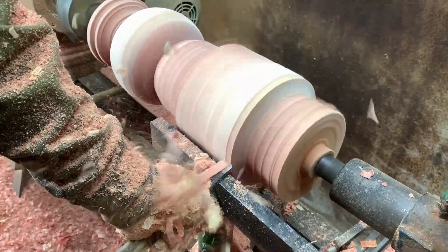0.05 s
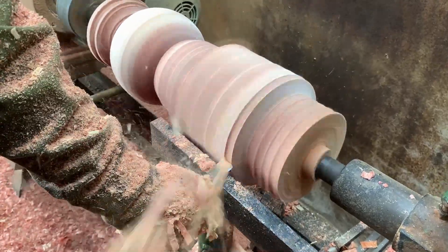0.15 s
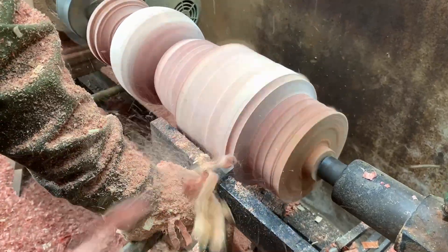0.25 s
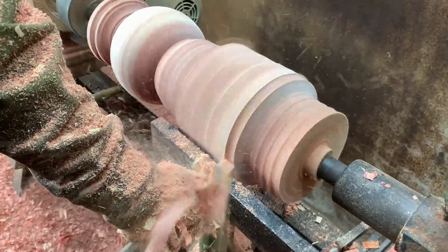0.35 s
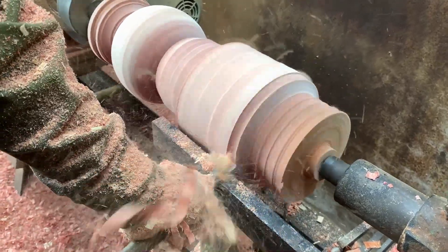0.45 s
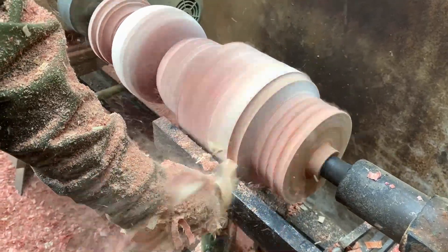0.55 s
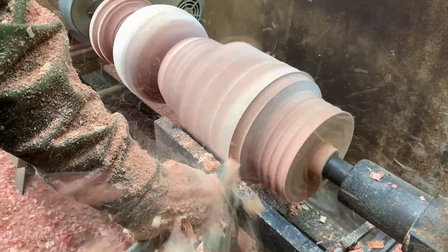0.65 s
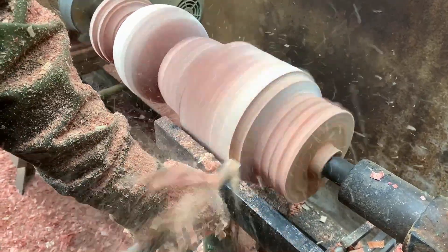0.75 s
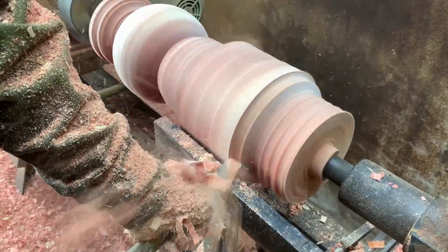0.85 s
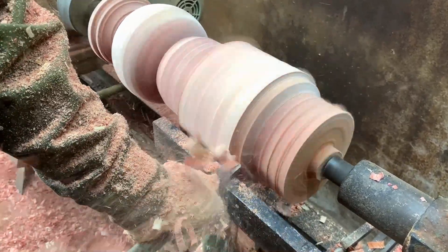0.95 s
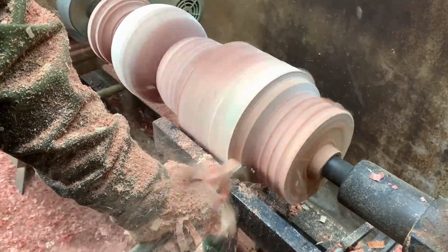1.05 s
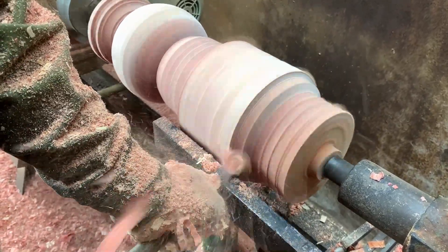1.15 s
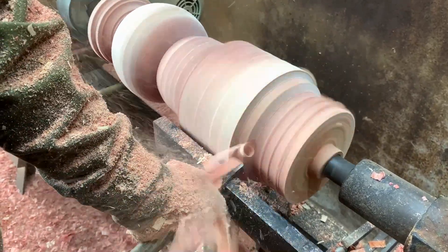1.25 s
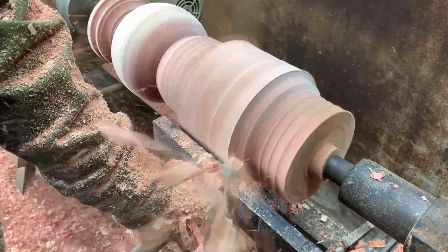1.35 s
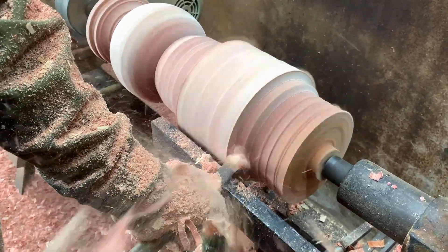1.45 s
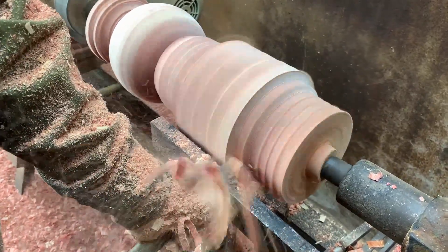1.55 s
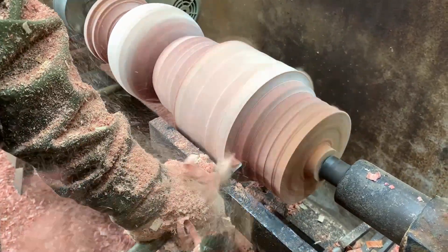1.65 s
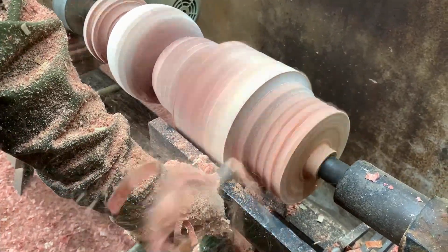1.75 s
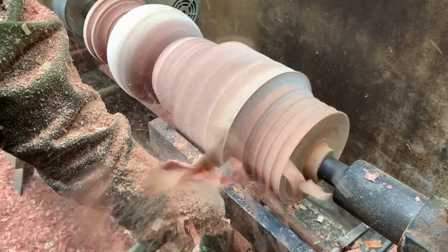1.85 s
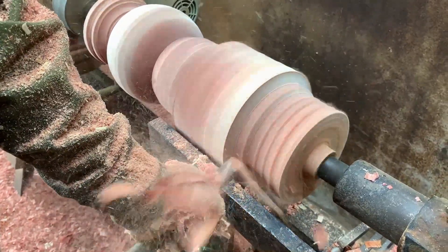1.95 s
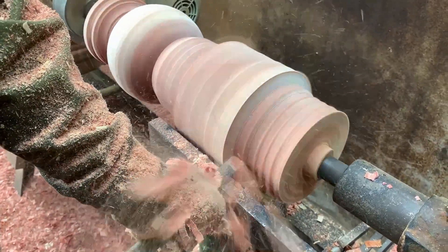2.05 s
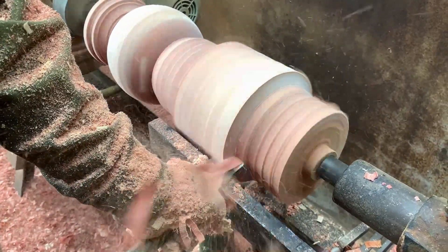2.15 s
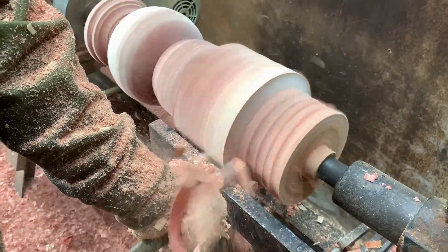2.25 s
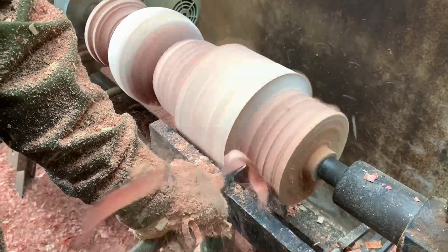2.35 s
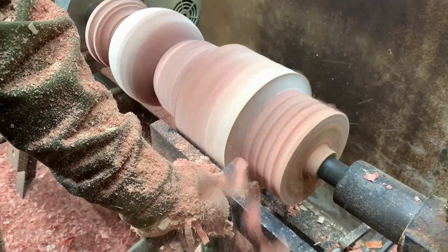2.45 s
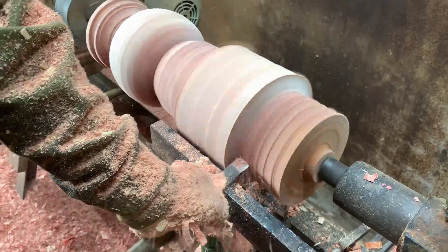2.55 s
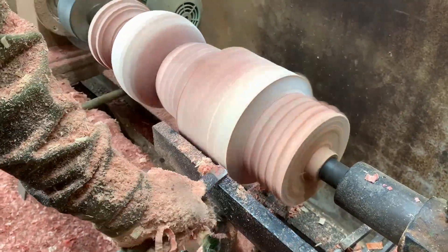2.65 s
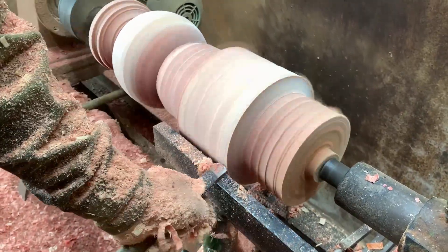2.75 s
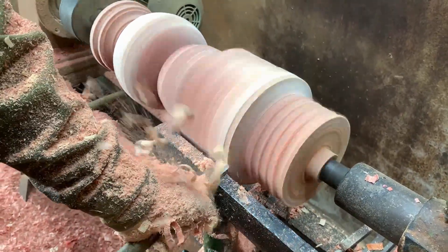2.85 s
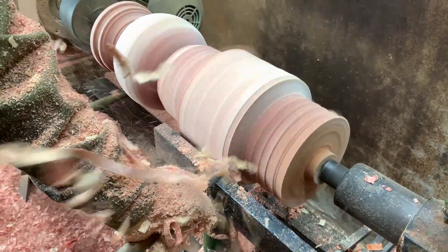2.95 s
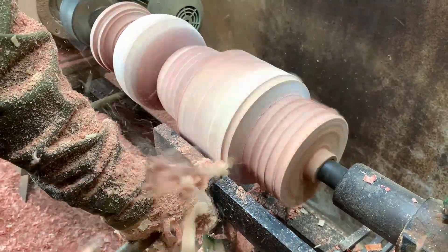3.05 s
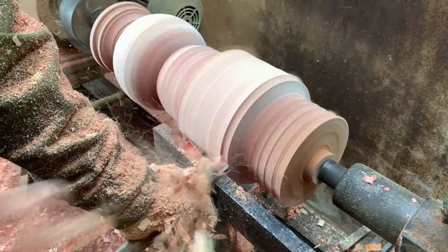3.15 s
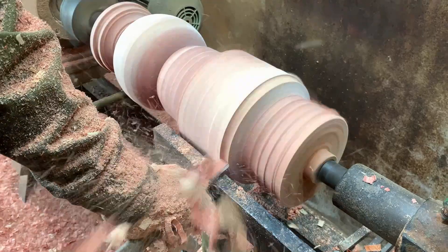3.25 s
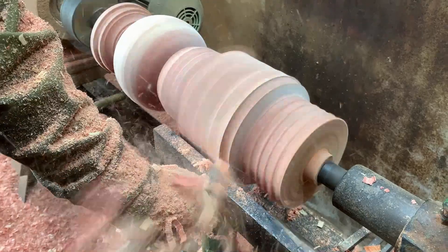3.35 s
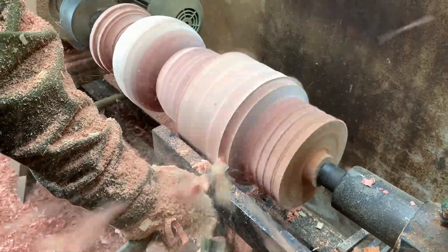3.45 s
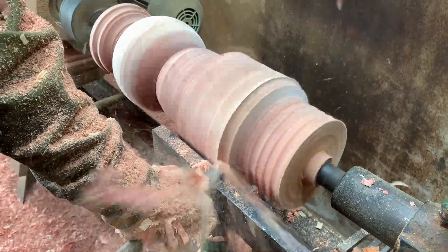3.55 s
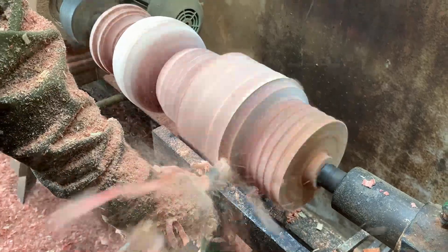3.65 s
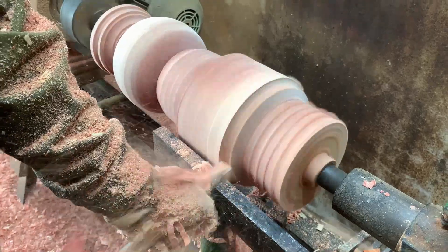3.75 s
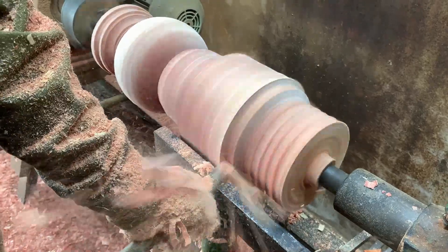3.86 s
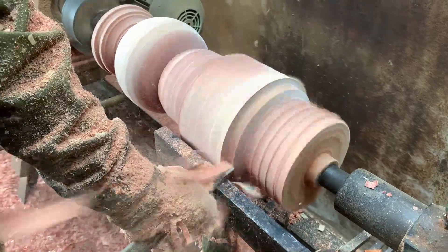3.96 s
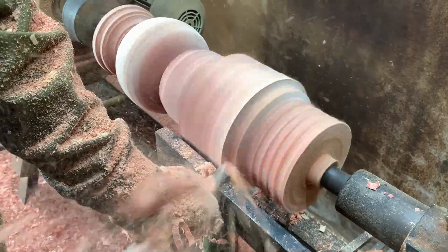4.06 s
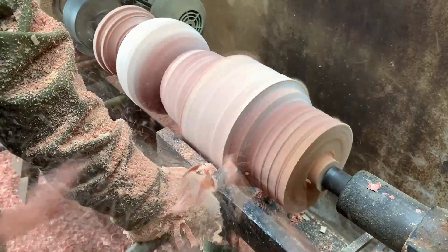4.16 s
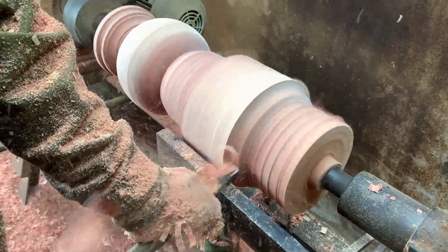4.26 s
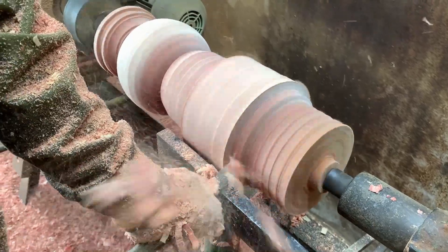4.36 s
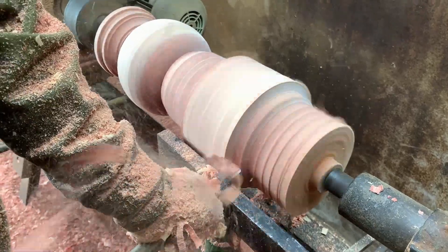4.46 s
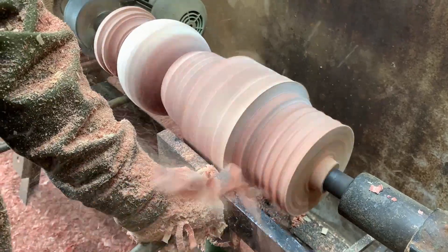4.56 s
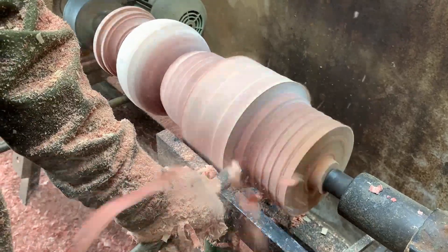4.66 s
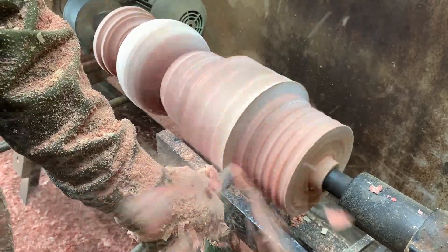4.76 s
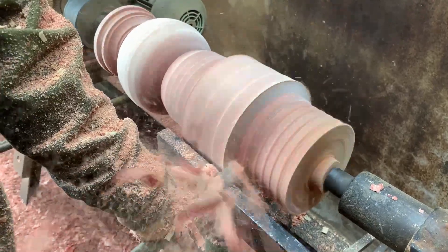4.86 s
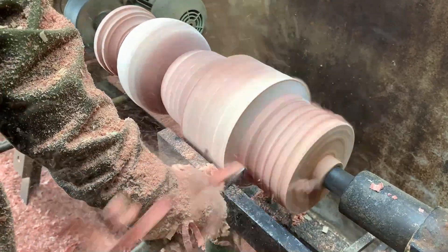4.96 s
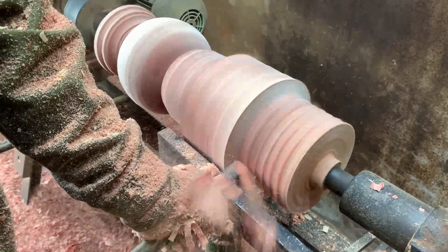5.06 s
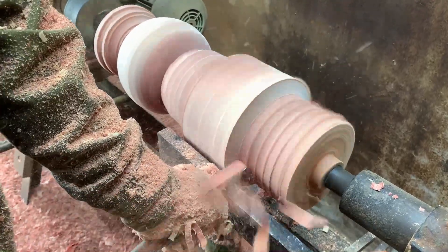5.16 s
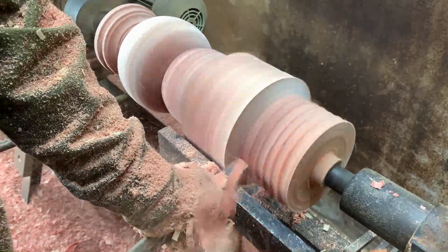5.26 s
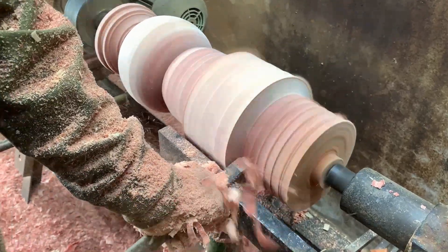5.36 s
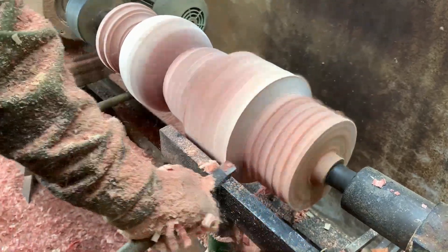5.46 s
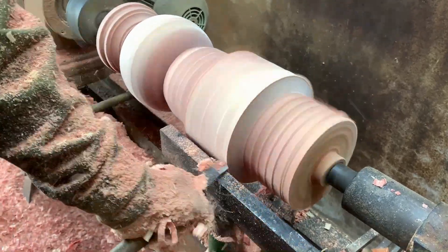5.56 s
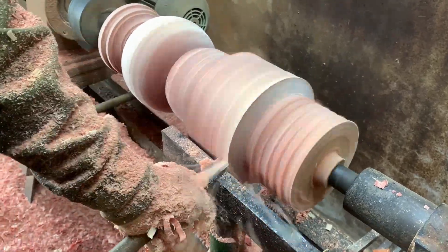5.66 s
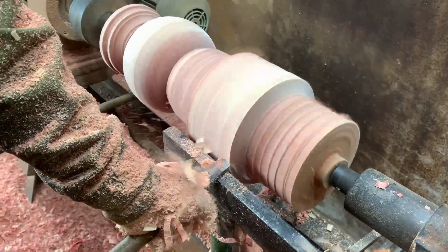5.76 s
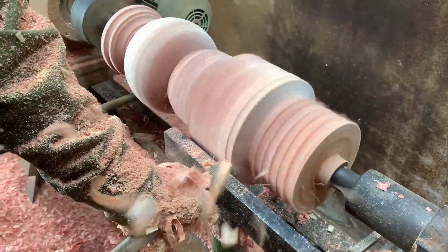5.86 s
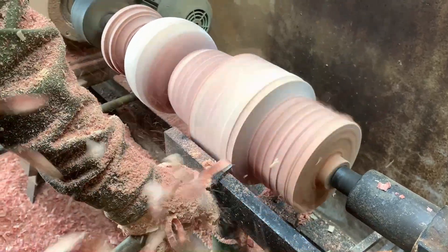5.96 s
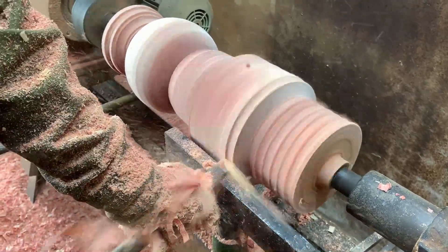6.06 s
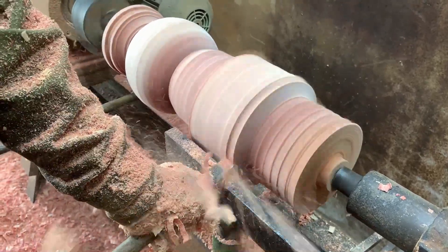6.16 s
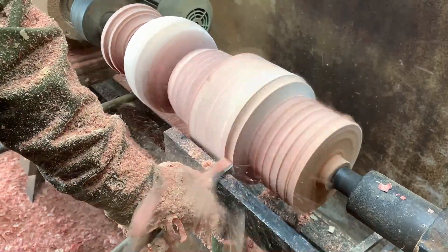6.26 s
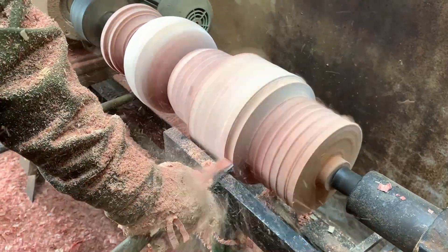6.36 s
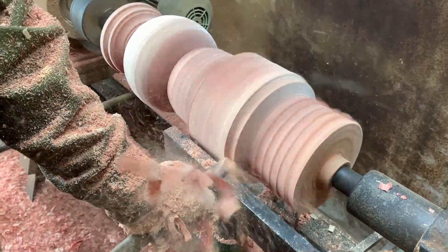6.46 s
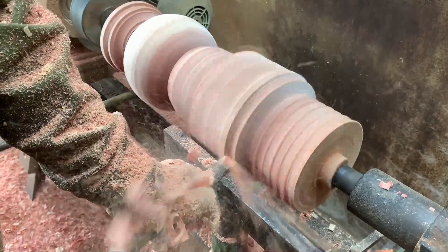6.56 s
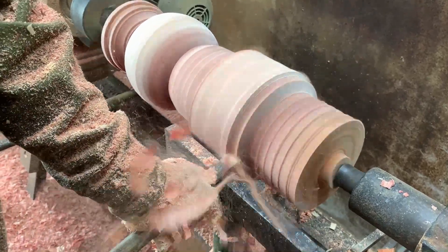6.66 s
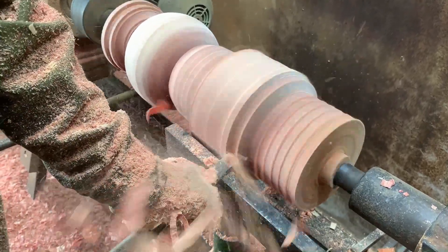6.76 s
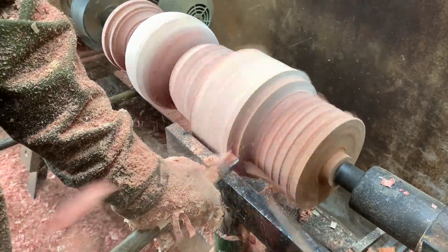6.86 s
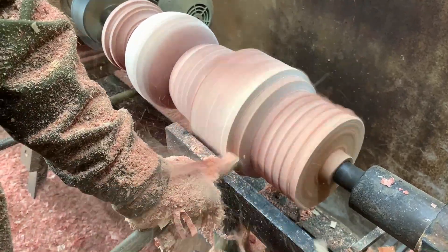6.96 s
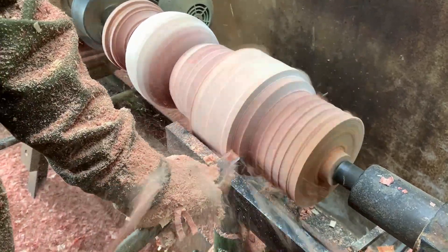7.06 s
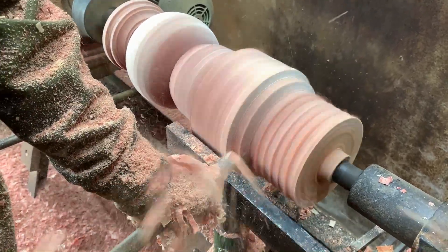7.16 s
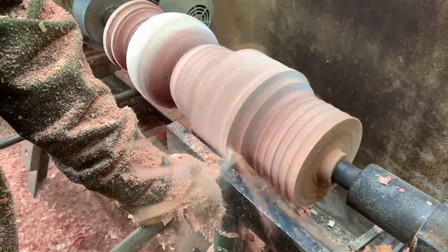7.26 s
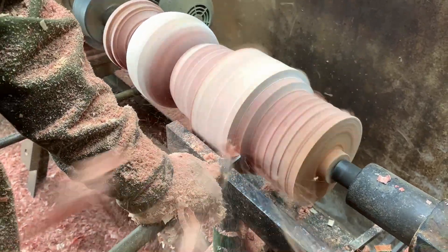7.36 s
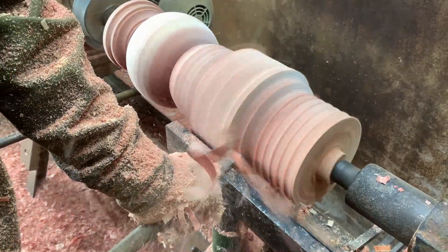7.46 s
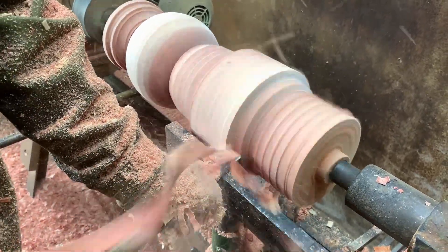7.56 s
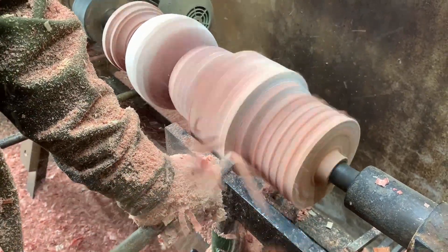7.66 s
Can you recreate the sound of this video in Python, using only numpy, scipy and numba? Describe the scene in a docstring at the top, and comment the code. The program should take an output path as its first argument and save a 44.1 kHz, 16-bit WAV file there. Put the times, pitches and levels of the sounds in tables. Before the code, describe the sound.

Close to a lathe in a workshop, a gouge peels a spinning wooden blank in three passes of over two seconds each. Every cut is a rough metallic screech with bright hiss and crackle, throbbing rapidly with the rotation, its lower ring mostly gliding down. Splinters snap, shavings thump softly, and short gaps leave only the quiet motor hum and whir.

```python
"""Gouge on a spinning wooden blank

A gouge peels three passes off a blank on a lathe, close by. Noise and random snaps drive the steel's modes,
whose lower ring mostly falls as the tool slides further out over its rest; hiss and bright crackle lie on top.
Tough grain lifts the cut once a turn, splinters crack off and the edge crunches as it snags on entry. The blank
rings low, shavings land as dull thumps in stirred air, and wavering tones and noise run underneath."""
import sys
import numpy as np
from scipy import signal
from scipy.fft import rfft, irfft
from scipy.io import wavfile
from scipy.ndimage import uniform_filter1d
from numba import njit

SR = 44100
rng = np.random.default_rng(int(sys.argv[2]) if len(sys.argv) > 2 else 0)


def digitize_waveform(pressure):
    """Quantize a signal to 16-bit integers and store it at the path in sys.argv[1].

    Rows of a 2-D input are taken as channels; values are limited to [-1, 1].
    """
    field = np.atleast_2d(pressure).T
    bounded = np.clip(field, -1, 1)
    quanta = np.round(bounded * 32767).astype(np.int16)
    wavfile.write(sys.argv[1], SR, quanta)


N = 339570
TIME = np.arange(N) / SR
TURNS_PER_S = 16.75

# the three passes: (edge bites [s], slide starts [s], edge lifts [s], least overhang [0-1],
# share of the full stroke, lighter at entry [dB], fade on lifting [dB per s], sag of the high modes [0-1])
PASSES = [(-0.2, 0.0, 2.575, .01, .975, 2, 370, .17), (2.852, 2.76, 5.385, .1, 1.01, 4.5, 230, .04),
          (5.7, 5.87, 8.0, .04, 1.0, 9, 300, 0)]
# the edge snags on the rim as it enters: (time [s], crunch level [dB], crackle level [dB], half length [s])
SNAGS = [(2.862, -28, -23, .009), (2.881, -24, -28, .009), (2.932, -33, -30, .012), (5.677, -52, -58, .012),
         (5.718, -33, -39, .016), (5.775, -29, -36, .012)]
# hiss of the parting fibres: (frequency [Hz], relative level per Hz [dB])
FIBRE_HISS = [(1000, 4), (2500, 8), (4500, 24.5), (5700, -44), (7500, -12), (11000, 18.5), (14000, -15.5),
              (15500, -35)]
# clumps of shavings landing: (nominal time [s], relative level [dB], pitch [Hz])
THUMPS = [(0.925, -37, 161), (0.959, -36, 75), (1.049, -39, 89), (1.119, -44, 61), (1.405, -37.5, 278),
          (2.365, -36, 135), (4.103, -32.5, 172), (5.39, -43, 80), (5.666, -34, 79), (6.453, -39, 114),
          (6.722, -42, 82), (6.899, -39, 97), (7.57, -44, 90)]


def cutting(ring_db, crackle_db, overhang, sag, tough_db):
    """The shaving breaks up unevenly; each break rings the tool and hisses."""
    # bending modes of the gouge: (width [Hz], [(overhang [0-1], frequency [Hz], relative level [dB]), ..])
    bending = [(136, [(0, 1240, -11), (.6, 1266, -8.5), (.85, 1120, -6.5), (1, 1050, 5.5)]),
               (81, [(0, 2397, -9.5), (.25, 2415, -6), (.42, 2280, 5), (.6, 2160, 7), (.8, 1870, 7),
               (1, 1900, 5)]), (158, [(0, 3780, 6.5), (.2, 3285, 9.5), (.4, 3063, 6.5), (.6, 3010, 3),
               (.8, 2820, -2), (1, 2970, -2.5)]), (417, [(0, 3700, -15), (.5, 3760, -19), (1, 3370, -30)]),
               (240, [(0, 4860, 2.5), (.4, 4820, -3.5), (.7, 4900, -4.5), (1, 4540, -16.5)]),
               (214, [(0, 5000, -22), (.5, 4950, -29.5), (1, 5200, -18)]), (945, [(0, 3420, -15.5),
               (.5, 2590, -8.5), (1, 2040, -15.5)])]
    # high modes of the gouge: (width [Hz], [(overhang [0-1], frequency before sag [Hz], relative level [dB]), ..])
    shrill = [(450, [(0, 6470, 0.5), (.25, 6540, 7), (.5, 6760, 3), (1, 5900, -7)]), (450, [(0, 7930, 7),
              (.25, 8300, 5.5), (.5, 8540, 9.5), (.8, 8680, 12.5), (1, 8600, 19.5)]),
              (700, [(0, 9800, -16.5), (.6, 9700, 13.5), (1, 9700, 4)]), (800, [(0, 12680, 3),
              (.5, 12910, 16), (.68, 12600, 22), (.78, 10740, 17), (.85, 10650, 8), (1, 9300, 10.5)]),
              (800, [(0, 13600, -45), (.6, 13500, -32), (1, 12800, 9)])]
    breaks = breakage(66)
    wobble = overhang + .021 * drift(20)   # the tool shifts in the hand

    force_db = .62 * tough_db + 1.1 * breaks
    force = tearing(force_db, snaps_per_s=640, snap_size=1.4, spread_db=2.0)
    ring = through_rest(gouge(force, bending, wobble, flicker_db=1.82))
    ring = evened(with_echoes(ring, wet=0.57))

    sharp_db = tough_db + 2.1 * breaks
    sharp = tearing(sharp_db, snaps_per_s=800, snap_size=.9, spread_db=2.5)
    hiss = from_db(-10.0 + sharp_db) * noise(FIBRE_HISS)
    crackle = through_rest(gouge(sharp, shrill, wobble, flicker_db=3.0, sag=sag) + hiss)
    crackle = evened(with_echoes(crackle, wet=.5))

    # both lean slightly to the second ear
    ring = from_db(ring_db) * ring * from_db([[-.45], [.45]])
    crackle = from_db(crackle_db) * crackle * from_db([[-.25], [.25]])
    return ring + crackle


def gouge(force, modes, overhang, flicker_db, sag=0):
    """The steel's modes shift and trade strength as more of it overhangs the rest; each flickers by itself."""
    out = 0
    for width_hz, track in modes:
        hz, db = along(track, overhang)
        flickering = force * from_db(flicker_db * drift(70))
        out = out + from_db(db) * resonate(flickering, hz * (1 - sag), width_hz)
    return out


def tearing(force_db, snaps_per_s, snap_size, spread_db):
    """Steady rubbing plus fibres that snap at random, both following the cutting force."""
    snapping = rng.random(N) < snaps_per_s / SR
    strength_db = spread_db * np.minimum(rng.exponential(1, N), 4)
    snaps = snapping * from_db(strength_db)
    return from_db(force_db) * white() * (1 + snap_size * snaps)


def breakage(corner_hz, size=1100):
    """The shaving snaps and re-forms many times within one turn; slower change is removed."""
    fast = drift(corner_hz)
    return rms_one(fast - uniform_filter1d(fast, size))


def toughness():
    """Extra cutting force in dB as the tough side and the hard streaks come round."""
    # the tough side of the blank, one row per pass: (place on the rim [turns], level [dB])
    tough_side = [(.25, 4), (.82, 3.2), (.29, 6.5)]
    # narrow streaks of hard grain: (from [s], to [s], place on the rim at start [turns], at end [turns], level [dB])
    streaks = [(.65, 1.6, .15, .25, 4.5), (1.7, 2.2, .9, .84, 6), (2.95, 4.4, .71, .92, 4),
               (2.95, 3.95, .4, .48, 4), (4.42, 4.95, .59, .61, 7), (5.95, 7.7, .38, .38, 3)]
    side_width_turns, streak_width_turns, streak_fade_s = .18, .055, .08
    place, side_db = per_pass(tough_side)
    out = side_db * once_a_turn(place, side_width_turns)
    for start, end, first, last, db in streaks:
        present = np.clip(np.minimum(TIME - start, end - TIME) / streak_fade_s + .5, 0, 1)
        place = np.interp(TIME, [start, end], [first, last])
        out = out + db * present * once_a_turn(place, streak_width_turns)
    return out


def handling():
    """The edge bites, bounces, settles, slides out and lifts: contact in dB, overhang 0-1, sag of pitch 0-1."""
    # the stroke that every pass follows: (time since the slide started [s], overhang before scaling [0-1])
    stroke = [(-.15, 0), (.1, .06), (.5, .18), (1.0, .36), (1.5, .6), (2.0, .75), (2.7, .98)]
    attack_db_per_s, settle_s = 2000, .11   # the edge enters at once, then settles to full depth
    bounce_db, bounce_delay_s, bounce_width_turns = 13, .047, .17
    # the high modes sink over about this long around the lift, lowest this long after it, as the pressure comes off
    sag_s = .05
    free_db = -45   # contact with the edge in free air

    bite_s, slide_s, lift_s, entry, reach, light_db, fade_db_per_s, sag_share = per_pass(PASSES)
    attack_db = attack_db_per_s * np.minimum(TIME - bite_s, 0)
    # until it settles, the edge is thrown off once a turn
    thrown_db = bounce_db * once_a_turn((bite_s + bounce_delay_s) * TURNS_PER_S, bounce_width_turns)
    settle_db = -(light_db + thrown_db) * np.exp(-np.maximum(TIME - bite_s, 0) / settle_s)
    release_db = -fade_db_per_s * np.maximum(TIME - lift_s, 0)
    contact_db = np.maximum(attack_db + settle_db + release_db, free_db)

    slid, = along(stroke, TIME - slide_s)
    overhang = np.maximum(reach * slid, entry)
    sag = sag_share * np.exp(np.minimum((TIME - lift_s) / sag_s - 1, 0))
    return contact_db, overhang, sag


def cut_levels(contact_db):
    """Ring and crackle in dB follow effort and contact; the crackle jumps where the edge snags."""
    # how hard the gouge cuts, one table per pass, before trims and contact:
    # (time [s], tool ring level [dB], crackle level [dB])
    effort = [
        [(0.02, -22.9, -31.4), (0.34, -22.3, -28.7), (0.5, -24.6, -31.5), (0.9, -22.5, -28.7),
         (1.06, -26.0, -33.9), (1.54, -22.0, -27.2), (1.62, -24.8, -29.5), (1.86, -28.0, -29.6),
         (2.3, -25.3, -28.2), (2.56, -28.8, -31.4)],
        [(2.93, -26.1, -30.0), (3.19, -23.3, -27.2), (3.79, -26.3, -31.9), (3.89, -23.7, -29.6),
         (4.05, -25.1, -31.6), (4.21, -23.0, -28.4), (4.61, -27.3, -30.3), (4.77, -23.9, -26.7),
         (4.95, -26.5, -30.2), (5.35, -26.4, -28.3)],
        [(5.98, -26.7, -34.3), (6.22, -24.1, -29.6), (6.56, -27.0, -34.5), (6.74, -23.8, -29.7),
         (7.12, -25.6, -33.3), (7.24, -25.7, -29.5), (7.34, -27.6, -35.0), (7.66, -26.1, -30.3)],
    ]
    ring_trim_db, crackle_trim_db = .25, -.1
    crackle_follows = 1.3   # dB for each dB of contact
    ring_db, crackle_db = along(np.vstack(effort), TIME)
    crackle = from_db(crackle_db + crackle_trim_db + crackle_follows * contact_db)
    snagging = sum(swell(s, db, width_s) for s, _, db, width_s in SNAGS)
    return ring_db + ring_trim_db + contact_db, 20 * np.log10(crackle + snagging)


def splinters():
    """A splinter is a few milliseconds of dense, bright cracking."""
    # splinters cracking off: (nominal time [s], relative level [dB])
    cracks = [(0.9028, -16.5), (1.1423, -21), (1.3808, -20), (1.5035, -14), (1.8981, -20), (2.8555, -19),
              (3.0849, -15), (3.2071, -14), (3.4231, -17), (4.4523, -18.5), (4.7496, -20), (4.809, -16),
              (7.224, -17), (7.5424, -18)]
    bright = resonate(white(), 13400, 1500) + from_db(-12) * noise(FIBRE_HISS)
    bright = rms_one(through_rest(bright))
    bursts = sum(swell(s + 0.00068, db, width_s=0.0052) for s, db in cracks)
    return from_db(-6) * bright * bursts


def snags():
    """A snag crushes the rim with a broad crunch."""
    centre_hz, width_hz = 3400, 2400
    crunch = resonate(resonate(white(), centre_hz, width_hz), centre_hz, width_hz)
    crunch = rms_one(through_rest(crunch))
    return crunch * sum(swell(s, db, half_s) for s, db, _, half_s in SNAGS)


def blank(level_db, tough_db, bite):
    """The same cut shakes the heavy blank, which rings low, and a little higher once the tool lets go."""
    # ring of the blank between its centres, edge in the wood: (frequency [Hz], width [Hz], relative level [dB])
    blank_modes = [(598.2, 23.5, 2.5), (454, 41, -29.5), (240.5, 41, -20.5)]
    force = white() * from_db(0.23 * tough_db)
    freed = 1 + 0.13 * (1 - bite)
    ring = sum(from_db(db) * resonate(force, hz * freed, width_hz) for hz, width_hz, db in blank_modes)
    ring = signal.sosfilt(signal.butter(3, 720, fs=SR, output="sos"), ring)
    return from_db(level_db) * evened(ring)


def blank_level(contact_db, overhang):
    """The blank shakes most in mid stroke and never falls below its idle level; in dB."""
    # shaking along the stroke, before trim and contact: (overhang [0-1], level [dB])
    shake = [(0, -44), (.2, -38.5), (.5, -37.5), (1, -39.5)]
    trim_db, idle_db = -1, -59
    follows = .6   # dB for each dB of contact
    shake_db, = along(shake, overhang)
    return np.maximum(shake_db + trim_db + follows * contact_db, idle_db)


def shavings(draught_db):
    """Flying shavings stir lumpy air, and clumps land with a dull thump."""
    # air stirred by the blank and the flying shavings: (frequency [Hz], relative level per Hz [dB])
    stirred = [(20, -8), (40, -4), (70, 3), (130, -2), (200, -2.5), (300, -14), (600, -23), (1500, -38)]
    air = from_db(draught_db + 2.7 * drift(19)) * noise(stirred)
    puff = white()
    thumps = 0
    for s, db, hz in THUMPS:
        thump = rms_one(resonate(resonate(puff, hz, 130), hz, 130))
        thumps = thumps + swell(s + 0.016, db - 4.5, width_s=0.011) * thump
    return (air + thumps) * from_db([[-.8], [.8]])


def draught_level():
    """The draught in dB wanders slowly and swells around each falling clump."""
    air_db, wander_db, wander_hz = -54.7, 1.5, 5
    # air pushed along by a clump of pitch gust_hz, relative to its tabled level; higher-pitched clumps push less
    gust_db, gust_s, gust_hz = -18, .09, 80
    gusts = sum(gust_hz / hz * swell(s + .04, db + gust_db, gust_s) for s, db, hz in THUMPS)
    steady = from_db(air_db + wander_db * drift(wander_hz))
    return 20 * np.log10(steady + gusts)


def lathe():
    """Steady tones waver slightly over the rush of the running lathe."""
    # steady tones heard while the lathe runs: (frequency [Hz], relative level [dB])
    tones = [(226.1, -61), (452, -76), (624.5, -53), (6756, -80), (12010, -82)]
    # rush of the running lathe: (frequency [Hz], relative level per Hz [dB])
    rush = [(60, 2), (200, -1), (320, -8), (700, 0.5), (1300, 5.5), (2500, -7), (4500, -12), (8000, -11),
            (12500, -23), (15500, -18)]
    out = from_db(-56) * noise(rush)
    ears = np.array([[0], [np.pi / 2]])   # a quarter cycle apart
    for hz, db in tones:
        wavering_hz = hz * (1 + 0.0014 * drift(15))
        phase = 2 * np.pi * np.cumsum(wavering_hz) / SR
        level = from_db(db + 2.0 + drift(22))
        out = out + level * np.sqrt(2) * np.sin(phase + ears)
    return out


def through_rest(x):
    """The rest and bed colour the sound: a falling mode flares as it crosses one of their resonances."""
    # resonances (+) and hollows (-) of the tool rest and bed: (frequency [Hz], width [Hz], level [dB])
    resonances = [(830, 220, -11), (1090, 110, 4), (1280, 70, 3), (1925, 60, 5), (2030, 70, -4),
                  (2181, 45, 6), (2443, 60, 7), (2905, 50, 3), (3015, 45, 4), (3386, 70, 3), (3690, 50, 3),
                  (3820, 45, 3), (4430, 90, 4), (4925, 70, 5), (5700, 450, -9), (6100, 250, -4),
                  (8763, 70, 5), (10545, 90, 7), (11550, 400, -5), (11800, 80, 6), (12080, 200, -4),
                  (12364, 130, 6), (15600, 1200, -9)]
    for hz, width_hz, db in resonances:
        x = x + (from_db(db) - 1) * resonate(x, hz, width_hz)
    return x


def with_echoes(x, wet):
    """A few early echoes, different for each ear."""
    # echoes from the bench and the wall behind, one side to each row: (delay [s], share before the wet factor)
    reflections = [
        [(.0023, .3), (.0061, -0.24), (.0107, 0.19), (.0173, -0.32), (.0269, 0.18)],
        [(.0031, -0.26), (.0053, .27), (.0127, -0.4), (.0199, 0.35), (.0307, -0.075)],
    ]
    at = np.arange(N)
    echoed = []
    for ear, side in zip(x, reflections):
        echoed.append(sum(share * np.interp(at - delay * SR, at, ear, left=0) for delay, share in side))
    return x + wet * np.array(echoed)


def resonate(x, hz, width_hz):
    """A resonance of given frequency, fixed or moving, and width."""
    return two_pole(x, np.cos(2 * np.pi * hz / SR) * np.ones(N), np.exp(-np.pi * abs(width_hz) / SR))


@njit
def two_pole(x, cosine, r):
    """Band-pass with gain 1 at a centre that may move."""
    y = np.zeros_like(x)
    for c in range(2):
        for i in range(2, x.shape[1]):
            drive = (1 - r * r) / 2 * (x[c, i] - x[c, i - 2])
            y[c, i] = drive + (1 + r * r) * cosine[i] * y[c, i - 1] - r * r * y[c, i - 2]
    return y


def once_a_turn(place, width):
    """A bump from 0 to 1 each time a place on the rim passes under the edge."""
    away = (TIME * TURNS_PER_S - place + .5) % 1 - .5
    return np.exp(-.5 * (away / width) ** 2)


def per_pass(rows):
    """Each column of a table with one row per pass, held from just before that pass begins."""
    starts = np.transpose(PASSES)[0] - .05
    return np.array(rows)[np.searchsorted(starts, TIME) - 1].T


def swell(s, db, width_s):
    """A short rounded burst of level."""
    return from_db(db) * np.exp(-np.minimum(((TIME - s) / width_s) ** 2, 40))


def evened(x, size=5266):
    """Holds the level steady over two turns, keeping the throb inside each turn."""
    power = np.abs(uniform_filter1d(np.mean(x ** 2, axis=0), size))
    return x / np.sqrt(power + 1e-12)


def noise(spectrum):
    """Stereo noise of a given colour, rms 1."""
    hz, level_db = np.transpose(spectrum)
    bins = np.maximum(np.arange(N // 2 + 1) * SR / N, 1)
    colour = from_db(np.interp(np.log(bins), np.log(hz), level_db))
    return rms_one(irfft(rfft(white()) * colour, N))


def white():
    """Stereo white noise: the two ears hear unrelated fine detail."""
    return rng.standard_normal((2, N))


def drift(corner_hz):
    """Slow chance with spread 1, drawn at a tenth of the sample rate and smoothed by two equal poles."""
    r = np.exp(-20 * np.pi * corner_hz / SR)
    slow = signal.lfilter([1], [1, -2 * r, r * r], rng.standard_normal(N // 10 + 4002))[4000:]
    return np.interp(np.arange(N) / 10, np.arange(len(slow)), rms_one(slow))


def along(rows, where):
    """Each column of a table, read at the given values of its first column."""
    first, *columns = np.transpose(rows)
    return [np.interp(where, first, c) for c in columns]


def from_db(db):
    """Decibels to amplitude."""
    return 10 ** (np.asarray(db) / 20)


def rms_one(x):
    """Scales a signal to rms 1."""
    return x / np.sqrt(np.mean(x ** 2) + 1e-20)


def scene():
    """The gouge with its splinters and snags, the ringing blank, the falling shavings and the running lathe."""
    contact_db, overhang, sag = handling()
    ring_db, crackle_db = cut_levels(contact_db)
    tough_db = toughness()
    bite = np.interp(ring_db, [-48, -31], [0, 1])   # 0 in free air, 1 in the wood
    tool = cutting(ring_db, crackle_db, overhang, sag, tough_db) + splinters() + snags()
    wood = blank(blank_level(contact_db, overhang), tough_db, bite)
    return tool + wood + shavings(draught_level()) + lathe()


def record(dry):
    """The top is cut steeply above 15.6 kHz."""
    return signal.sosfilt(signal.ellip(12, .2, 90, 15600, fs=SR, output="sos"), dry)


dry = scene()
out = record(dry)
digitize_waveform(out)
```